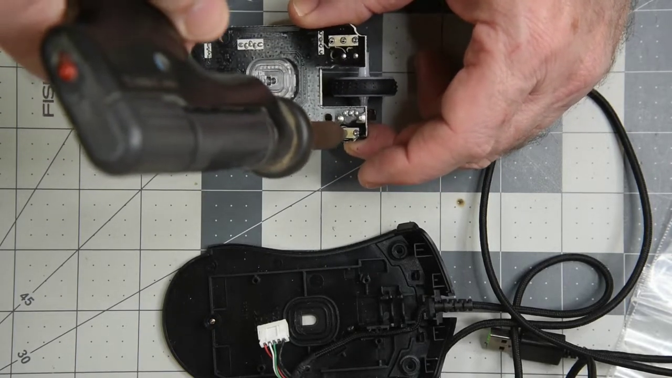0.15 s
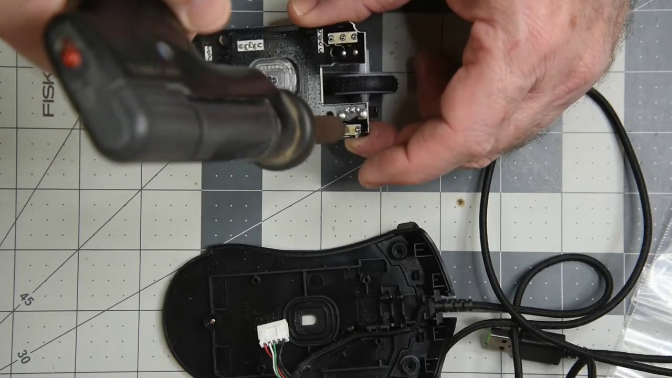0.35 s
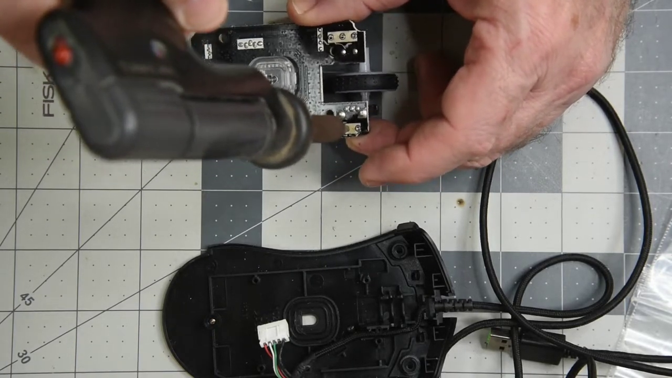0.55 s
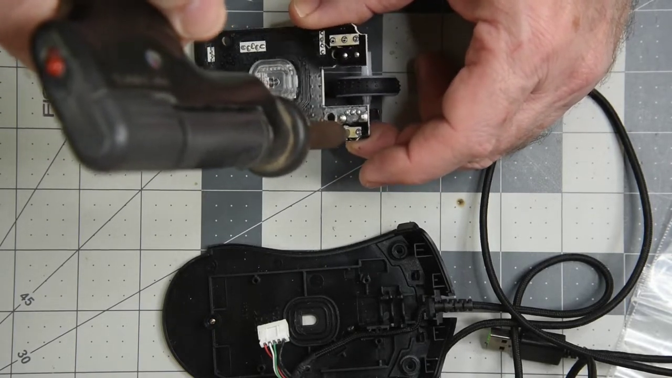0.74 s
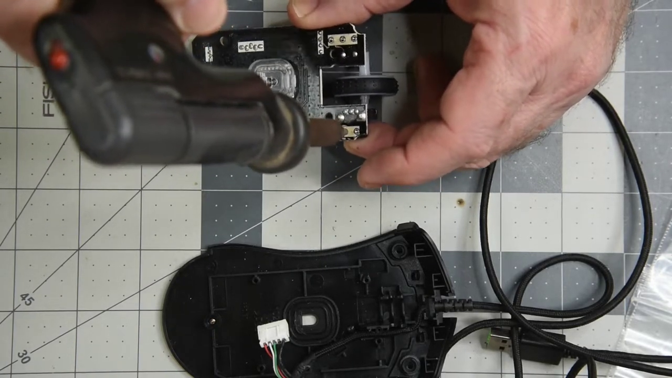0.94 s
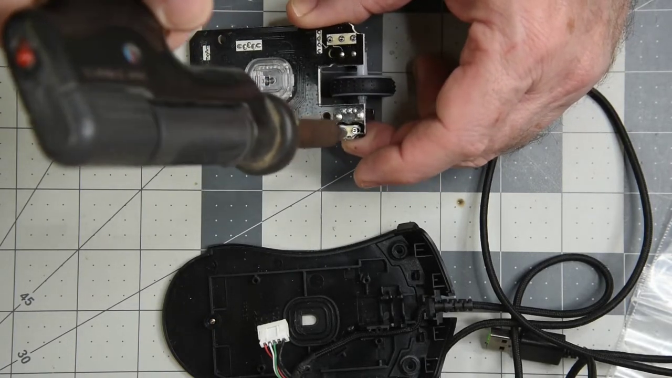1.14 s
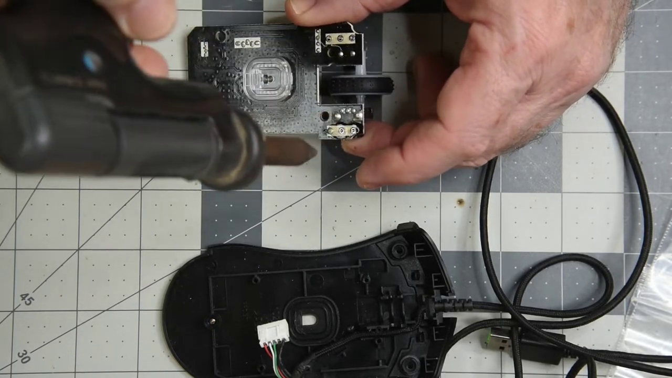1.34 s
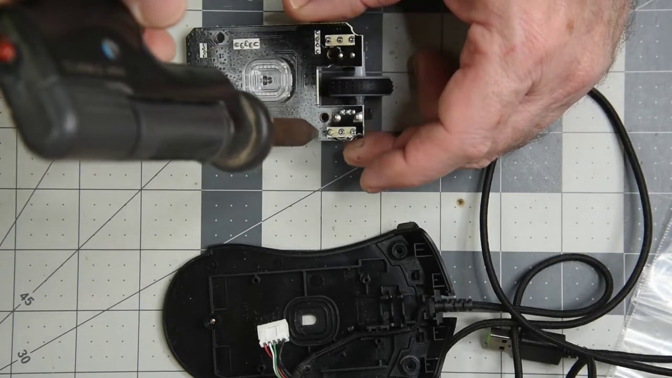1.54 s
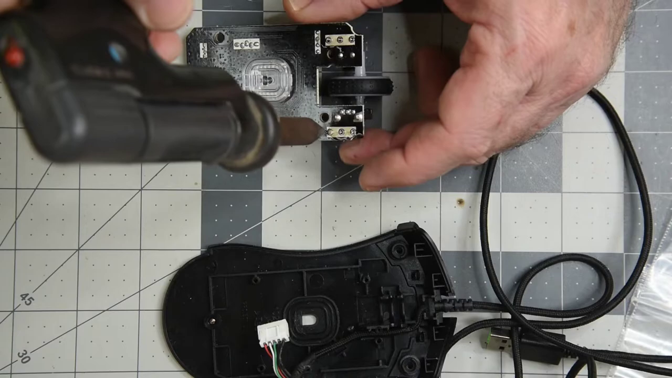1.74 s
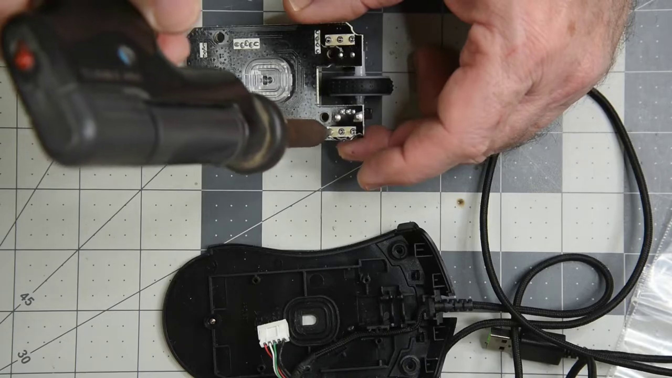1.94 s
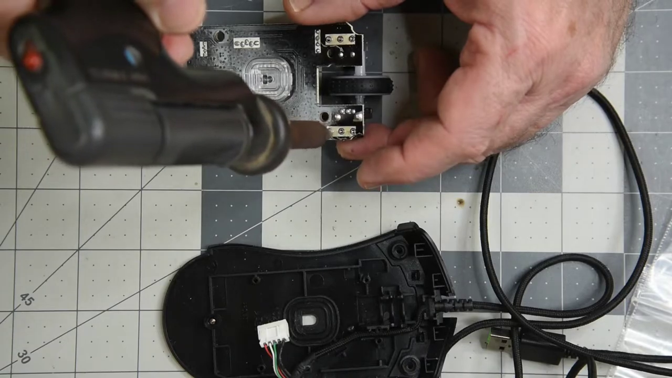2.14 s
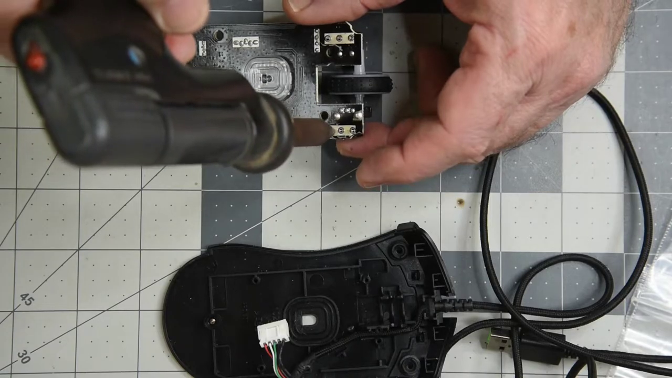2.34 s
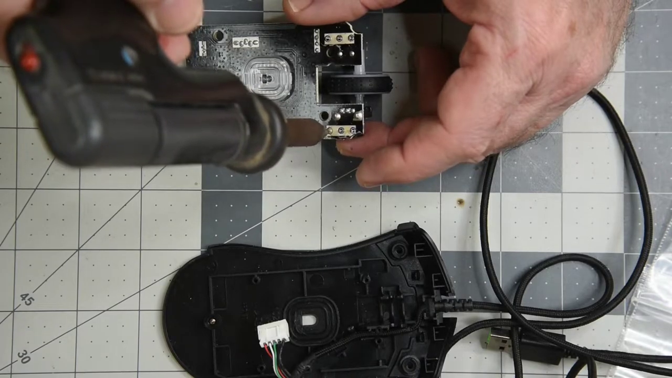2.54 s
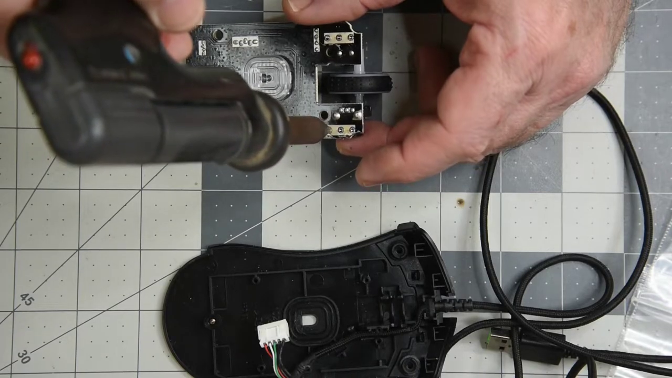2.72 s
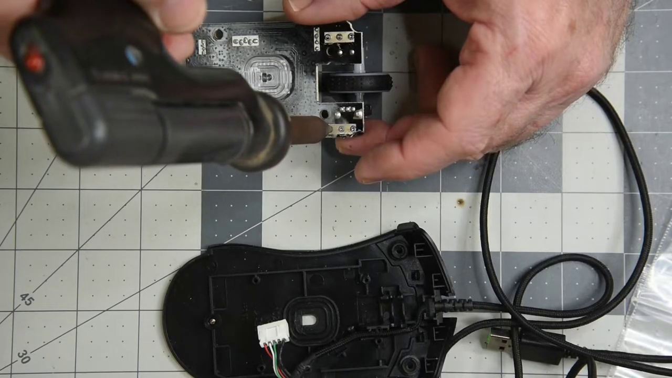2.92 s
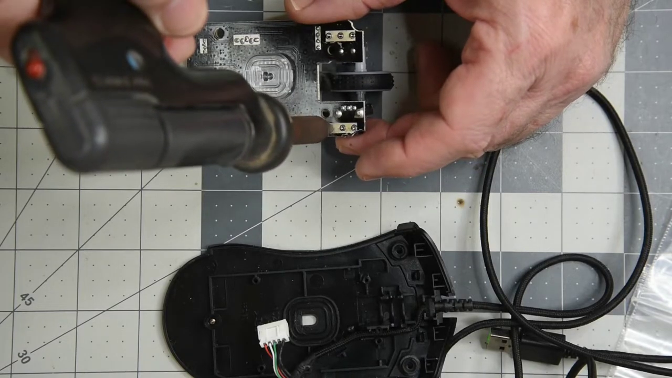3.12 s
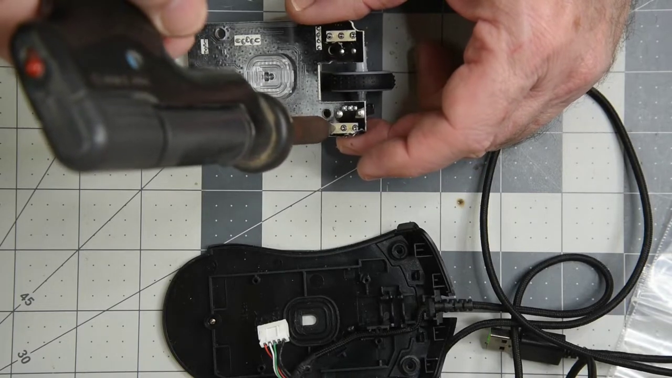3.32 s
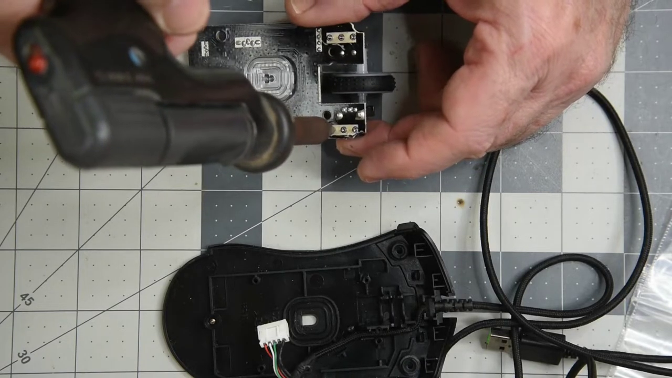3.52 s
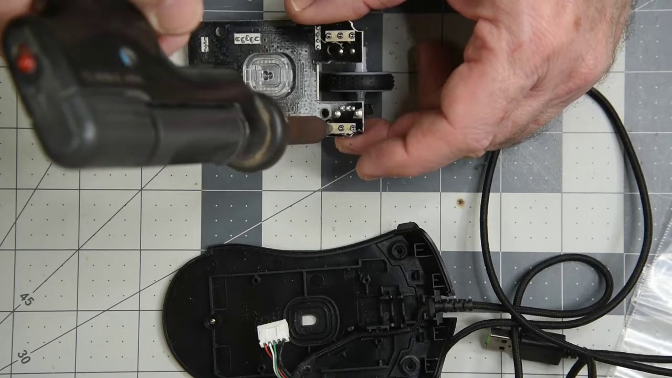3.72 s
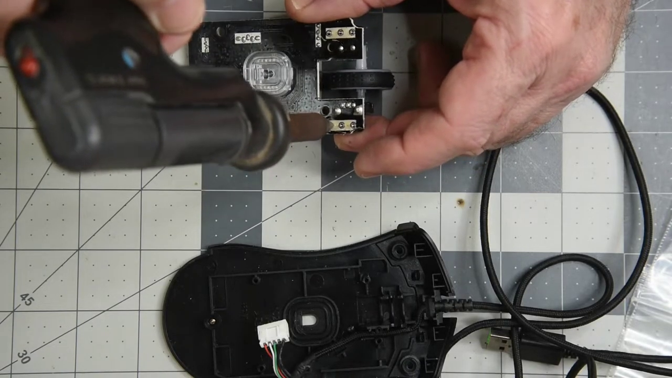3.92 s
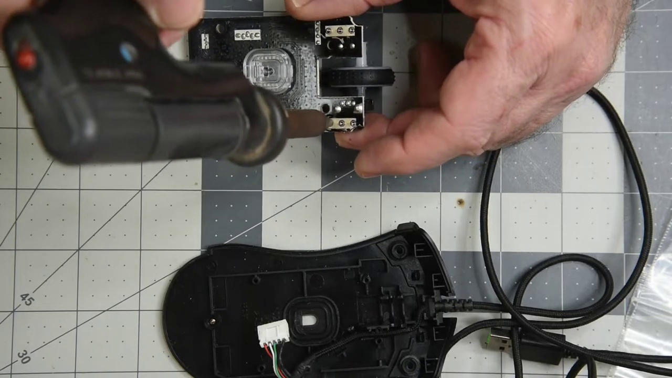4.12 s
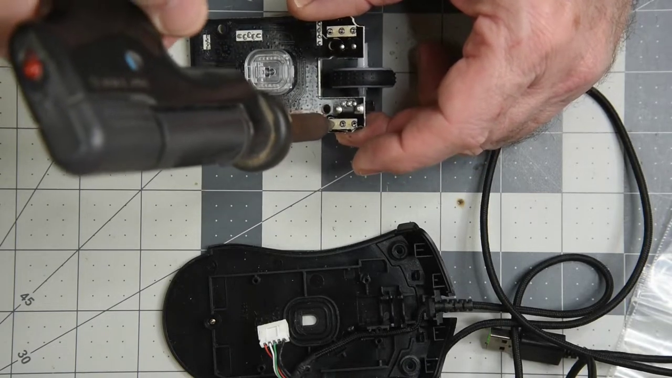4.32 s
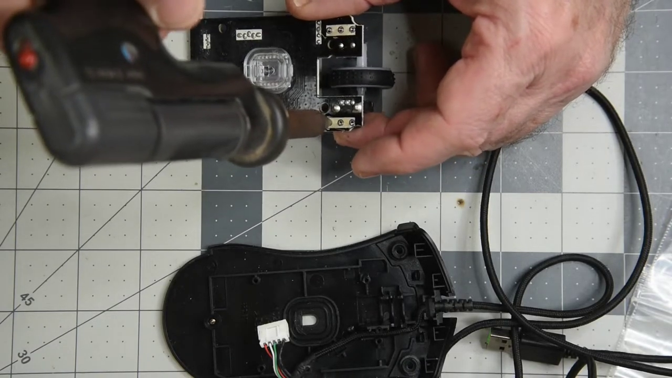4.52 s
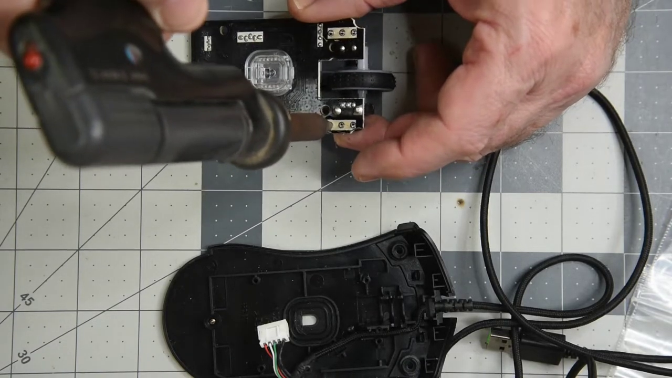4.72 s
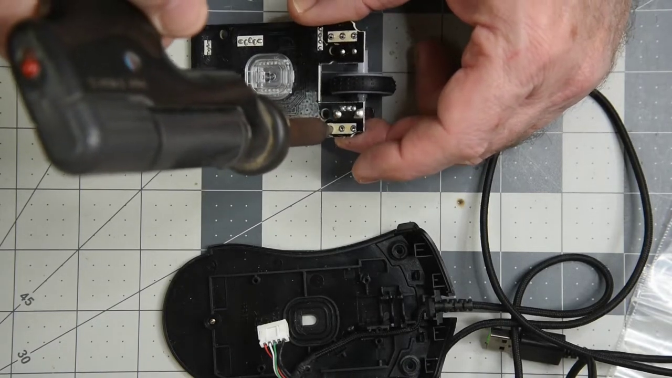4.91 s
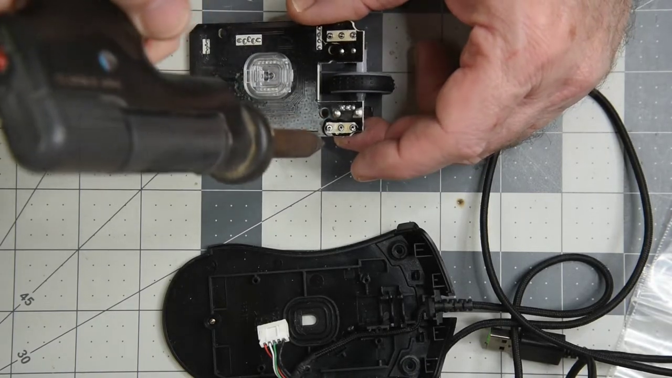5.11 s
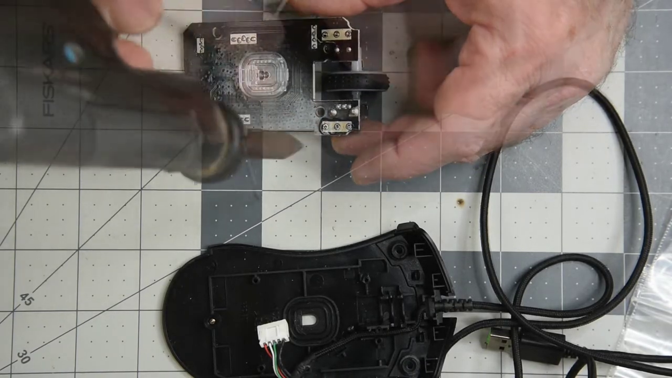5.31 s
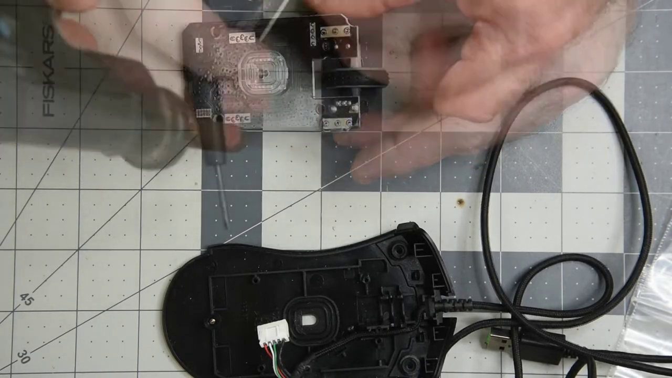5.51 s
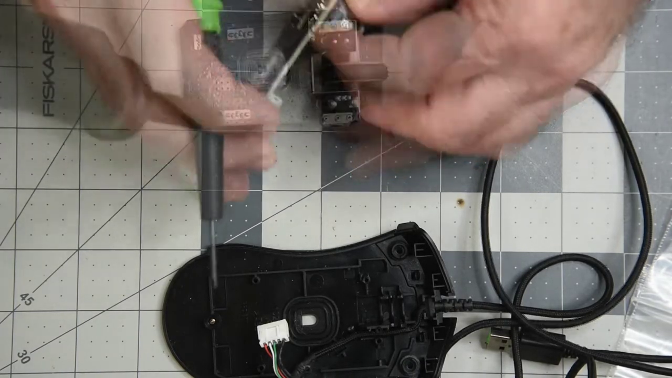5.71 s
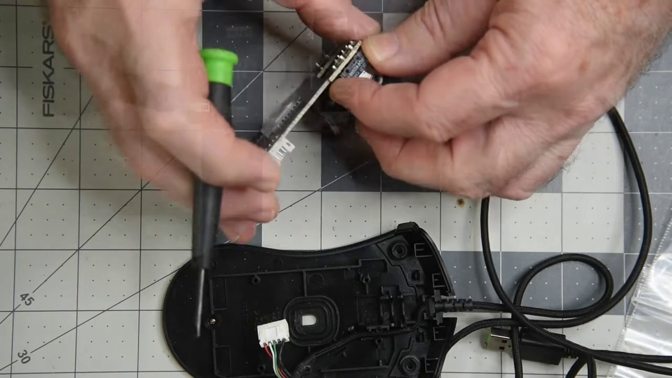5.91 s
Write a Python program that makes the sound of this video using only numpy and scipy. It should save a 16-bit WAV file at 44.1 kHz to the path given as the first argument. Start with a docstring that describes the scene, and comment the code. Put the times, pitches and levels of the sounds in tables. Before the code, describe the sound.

A trigger clicks, a small motor pump rattles with rushing suction air, then clunks off; after quiet ticking on a circuit board it runs once more.

```python
"""Two bursts of pump buzz and hissing air, each framed by a trigger click and a valve clunk, over a soft hum.
A vacuum desoldering gun clears two joints: a diaphragm pump speeds up to 28 strokes a second, a solenoid
valve opens, air rushes through the nozzle; on release the pump coasts down and the valve drops shut.
Place: a quiet workbench in stereo, the station left of centre, the gun central, the board slightly right.
Motors are summed harmonics and hits on a crank angle; air is coloured noise; knocks are dying noise bursts."""
import sys
import numpy as np
from scipy import signal
from scipy.fft import rfft, irfft, next_fast_len
from scipy.io import wavfile

SR = 44100
rng = np.random.default_rng(int(sys.argv[2]) if len(sys.argv) > 2 else 0)


def wrap_up_sound(samples):
    """Save the sound to the file named by the first command line argument, as 16-bit audio."""
    columns = np.atleast_2d(samples).T
    # keep every value between -1 and 1, then stretch to whole-number steps
    tamed = np.clip(columns, -1, 1)
    steps = np.round(tamed * 32767).astype(np.int16)
    wavfile.write(sys.argv[1], SR, steps)


N = 267157
T = np.arange(N) / SR   # time [s]

# All spectra hold relative levels; the sources set the loudness.
# Pulls of the trigger: (motor on [s], valve opens [s], motor off [s], a moment when the diaphragm
# bottoms out [s], full speed [strokes/s], level [dB])
PUMP_RUNS = [(.227, .2688, 1.154, .7606, 28.2, 0), (4.252, 4.4003, 5.0515, 4.7626, 27.97, .8)]
# Pump housing response: (multiple of the full stroke rate, level [dB])
HOUSING_ORDERS = [(1, -28), (2, -7), (3, -28), (4, -14), (5, -13), (6, -10), (7, -13), (8, -9), (9, -4),
                  (10, -4), (11, -13), (12, -4), (13, 0), (14, -9), (15, -2), (16, -12), (17, -19),
                  (18, -11), (19, -20), (20, -15), (21, -18), (22, -15), (23, -15), (24, -15), (25, -20),
                  (26, -14), (27, -15), (28, -14), (29, -22), (30, -31), (31, -21), (32, -16), (33, -22),
                  (34, -10), (35, -7), (36, -21), (37, -16), (38, -15), (39, -20), (40, -23)]
# Flap valves and linkage within one stroke: (share of the turn, level [dB])
CRANK_CONTACTS = [(0.094, 8), (0.173, -5.5), (0.385, -3), (0.493, 0.5), (0.584, -15), (0.723, -5),
                  (.975, 4)]
# Colour of those contacts: (frequency [Hz], level [dB])
RATTLE_COLOUR = [(850, -23.5), (1130, 5), (1400, 7), (1750, 0.5), (2150, 1), (2480, 11), (2800, 0.5),
                 (3250, -10), (3600, -10.5), (5000, -8.5), (8000, -53)]
# Air churning in the case: (frequency [Hz], level [dB])
CHURN_COLOUR = [(60, -36), (170, 2), (250, 12), (360, -4), (540, -26), (700, 15), (840, 3), (980, 15),
                (1200, -41), (2400, -17), (3300, -73)]
# Air in hose, nozzle and tip, one spectrum for each: (frequency [Hz], level [dB])
AIR_BANDS = [
    [(2700, 1), (3600, -5.5), (5200, -1), (5950, 6.5), (6900, 5), (7700, -20)],
    [(6300, -12), (7200, 5.5), (8300, 8.5), (9400, 8), (11200, 0.5), (12300, -19)],
    [(10400, -19.5), (11700, 2), (13300, -1.5), (14600, -5), (15600, -9), (16500, -30)],
]
# Tube resonances: (frequency [Hz], width [Hz], level [dB])
TUBE_PEAKS = [(5770, 110, 5), (7280, 90, 0.5), (8800, 96, 3.5), (9350, 160, 3), (10300, 270, 3.5),
              (13500, 280, 5.5)]
# Flow in hose, nozzle and tip: (steady suction [dB], gasp at motor start [dB],
# gush as the valve opens [dB], fall while coasting [dB/s])
AIR_FLOWS = [(-55.5, -48.5, -52, 109), (-51.5, -49.5, -47, 54), (-58, -71, -53.5, 2)]
# Air pulses on the stroke and on its return: (share of the turn, strength)
STROKE_PUFFS = [(.07, 0.64), (.58, 0.68)]
# Molten solder slurping through the tip: (time [s], length [s], level [dB])
SOLDER_SLURPS = [(0.556, 0.125, -49.5), (0.802, 0.12, -43)]
# Colour of the slurps: (frequency [Hz], level [dB])
SLURP_COLOUR = [(5000, -18), (8000, -2.5), (10000, -1), (12000, -5), (13800, 4), (15000, -3), (16000, -12)]
# Plunger hit and bounces as the valve opens: (time after the first hit [s], level [dB])
OPENING_BOUNCES = [(0, -28), (.0048, -34.5), (.015, -46), (.035, -43)]
# Plunger hit and bounces as the valve shuts: (time after the first hit [s], level [dB])
SHUTTING_BOUNCES = [(0, -38.5), (.007, -36), (0.034, -45.5)]
# Colour of the opening hits: (frequency [Hz], level [dB])
OPENING_COLOUR = [(90, -32), (180, -40), (280, 23), (440, 20), (620, 12.5), (1020, 18), (1250, 11.5),
                  (1500, 14.5), (2100, 18.5), (3300, 9), (4500, 7), (7000, -6), (9500, 1.5), (16000, -38)]
# Colour of the shutting hits: (frequency [Hz], level [dB])
SHUTTING_COLOUR = [(50, -42), (130, -24), (220, -5), (420, 0), (580, -5), (850, -3), (1400, -8), (2050, -6),
                   (2700, -20), (5500, -21), (10000, -26), (16000, -38)]
# Ringing of the station case: (frequency [Hz], level [dB], time to fall 60 dB [s])
STATION_CASE_MODES = [(246, -11, .1), (377, -6, .2), (456, -9, .08), (1018, -16, .07)]
# Trigger pressed: (time [s], level [dB])
TRIGGER_PRESSES = [(.063, -29.5), (4.1917, -30)]
# Trigger let go: (time [s], level [dB], ping of its spring [Hz])
TRIGGER_RELEASES = [(1.104, -30, 4516), (5.008, -30, 4950), (5.071, -41, 4390)]
# Colour of the press: (frequency [Hz], level [dB])
PRESS_COLOUR = [(590, -56), (1000, -18), (1200, -55), (1670, -10), (2470, -21.5), (2740, 2.5), (3340, -6.5),
                (4360, 1.5), (5630, 0.5), (6180, -4), (6550, 4.5), (7350, 1), (13800, -19), (15100, -16),
                (16000, -19)]
# Colour of the release: (frequency [Hz], level [dB])
RELEASE_COLOUR = [(2000, -21), (2800, 8), (3600, 6), (4150, 0), (4600, 12.5), (5150, 5), (7000, 10),
                  (8000, 1), (10500, 8), (13000, 0.5), (16000, -4)]
# Solder spitting up the nozzle: (time [s], level [dB])
SOLDER_SPITS = [(.2843, -31.5), (.296, -47), (.335, -33.5), (.4395, -37), (4.2908, -40.5), (4.42, -31.5),
                (4.4784, -39), (4.524, -35), (4.5702, -35), (4.7308, -33)]
# Colour of the spits: (frequency [Hz], level [dB])
SPIT_COLOUR = [(1200, -35), (2600, 3), (4500, -1.5), (7000, 7), (10000, 5), (14000, -3), (16000, -26)]
# Tip and fingers knocking the board: (time [s], level [dB])
BOARD_TAPS = [(2.549, -55.5), (2.669, -51), (2.775, -52.5), (2.789, -55), (3.568, -50.5), (3.971, -52),
              (5.331, -49.5), (5.461, -49)]
# Colour of the knocks, also of the sliding board: (frequency [Hz], level [dB])
BOARD_COLOUR = [(700, -6), (1600, -10), (2350, 1), (2750, -1), (3250, -3.5), (4300, -18), (7000, -18.5),
                (10000, -21), (16000, -57)]
# Tip catching on a pin: (time [s], level [dB])
PIN_TICKS = [(2.775, -60.5), (3.4045, -58), (3.632, -61), (3.6764, -59.5), (3.7447, -55.5), (3.779, -52.5),
             (4.077, -53), (4.1125, -48)]
# Colour of the pins: (frequency [Hz], level [dB])
PIN_COLOUR = [(1500, -13), (3000, -7), (5500, -2.5), (8400, 4), (10000, -1), (11100, 2.5), (12500, -7),
              (16000, -16)]
# Board slid and lifted: (time [s], length [s], level [dB])
BOARD_SLIDES = [(5.53, 0.18, -57), (5.844, 0.14, -60.5), (5.982, 0.074, -51.5)]
# Hum of the bench equipment: (frequency [Hz], level [dB])
HUM_TONES = [(120, -75), (240, -72.5), (360, -70), (480, -86), (720, -87), (1215, -83), (1323, -79.5),
             (1393, -81), (1449, -85)]
# Colour of the room noise: (frequency [Hz], level [dB])
ROOM_COLOUR = [(15, -35), (25, -10), (69, -9.5), (118, -11), (184, -14.5), (237, -9), (300, -11),
               (355, -10.5), (412, -13.5), (478, -12), (1100, -14.5), (1350, -14), (1610, -16.5),
               (2250, -12.5), (4000, -30.5), (5200, -64), (8800, -120)]
# Background hiss: (time [s], level [dB])
HISS_LEVEL = [(0, -73), (2.6, -75), (2.85, -72.5), (3.4, -75), (5.4, -70)]
# Colour of the hiss: (frequency [Hz], level [dB])
HISS_COLOUR = [(2060, -20), (3500, -0.5), (3730, -4.5), (4600, 4), (5090, -2.5), (6200, -3), (7850, -2),
               (9990, -1.5), (11000, -5), (12800, -3), (16000, -18)]
# Stereo spread of the room: (frequency [Hz], side level against mid [dB])
ROOM_SPREAD = [(60, -18), (110, -2), (200, -11), (380, -2), (700, -9), (1290, 1), (2380, 0.5), (4400, -0.5),
               (8120, -1), (15000, -20.5)]
# Stereo spread of the station: (frequency [Hz], side level against mid [dB])
STATION_SPREAD = [(100, -40), (400, -11), (900, -11), (2500, -4.5), (12000, 3)]
# Stereo spread of gun and board: (frequency [Hz], side level against mid [dB])
GUN_SPREAD = [(1000, -20), (3000, -3.5), (6000, -1.5), (10000, -13.5), (15000, -13)]

STATION_LEAD = 9   # samples by which the station reaches the left channel first
START_SPEED, SPIN_UP_S = 19, .06   # strokes/s at once, then the time constant towards full speed
COAST_S, COAST_LOSS = .156, 8   # from motor off until the valve shuts; strokes/s lost by then
ATTACK_S = 0.0059   # rise of the pump, of the valve's flow and of the surge
THUMP_DB, CHURN_DB = -45.5, -57   # before the pump's effort
EFFORT_DB_PER_SPEED = 0.05   # louder by this for each extra stroke/s
COAST_DB_PER_S = 116   # fade of the pump without power
SURGE_DB, SURGE_S = 4, 0.12   # extra labour as the valve opens; time constant
GASP_S, GUSH_S = 0.039, 0.12   # time constants of the air
LEAK_DB = -9.5   # air past the shut valve, relative to steady suction
SHUT_DB_PER_S = 270   # extra fall of the flow once the valve has shut
SLURP_EDGE_S, SLIDE_EDGE_S = .018, 0.073
BLEED_HZ, BLEED_SAG_HZ_PER_S, BLEED_DB = 13200, 27000, -54
BLEED_S, BLEED_EDGE_S = 0.212, 0.048
CASE_BUILD_S = 0.0058   # the case takes this long to start ringing
ROOM_DB = -67
CUTOFF_HZ = 15900


def pump(on_s, open_s, off_s, full_stroke_s, full_speed, run_db,
         body_db=0.27, linkage_db=-50.0, uneven_db=0.6, size=65536):
    """One run: the crank angle times the thump, the rattle and the puffs of air."""
    speed = motor_speed(on_s, off_s, full_speed)
    turns = np.cumsum(speed) / SR
    turns -= np.interp(full_stroke_s, T, turns)   # whole turns fall where the diaphragm bottoms out
    start = round(on_s * SR)
    on = slice(start, start + size)

    body = from_db(CHURN_DB) * noise(CHURN_COLOUR, STATION_SPREAD, lead=STATION_LEAD)
    body[:, on] += from_db(THUMP_DB) * thump(turns[on], speed[on])
    body[:, on] += from_db(linkage_db) * pan(rattle(turns[on]), left_db=2.5)

    surge_db = SURGE_DB * rise(open_s, ATTACK_S) * np.exp(-since(open_s) / SURGE_S)
    effort_db = body_db + surge_db + uneven_db * drift(25)
    effort_db = effort_db + EFFORT_DB_PER_SPEED * (speed - full_speed) - COAST_DB_PER_S * since(off_s)
    flow = air(on_s, open_s, off_s, turns)
    return from_db(run_db) * rise(on_s, ATTACK_S) * (from_db(effort_db) * body + flow)


def motor_speed(on_s, off_s, full_speed):
    """Strokes per second: the motor jumps to its start speed, creeps up to full speed and coasts down."""
    missing = (full_speed - START_SPEED) * np.exp(-since(on_s) / SPIN_UP_S)
    coasted = np.minimum(since(off_s) / COAST_S, 1) ** 1.6
    return full_speed - missing - COAST_LOSS * coasted


def thump(turns, speed, scatter=0.6, smear=0.11, slack=4.4):
    """The diaphragm shakes the housing once a turn; orders cross fixed resonances as the speed changes."""
    out = np.zeros((2, len(turns)))
    share = speed / speed.max()
    orders, housing_db = np.transpose(HOUSING_ORDERS)
    for order, chance in zip(np.round(orders), rng.standard_normal(len(orders))):
        # the pulse blurs in high orders and at low speed
        spread = scatter + smear * max(order - 15, 0) + slack * (1 - share)
        phase = 2 * np.pi * order * turns + chance * spread
        gain = from_db(np.interp(order * share, orders, housing_db))
        if order == 2:   # the rotor's unbalance grows with speed
            gain = gain * share ** 2
        lead = 2 * np.pi * order * speed * STATION_LEAD / SR
        out += gain * np.cos([phase + lead, phase])
    return out / np.sqrt(np.sum(from_db(housing_db) ** 2) / 2)


def rattle(turns, ring_t60=0.084, loose=0.31, size=4096):
    """Flaps and linkage hit at fixed crank angles, each with its own ring; loose parts add a rasp."""
    out, length, envelope = 0, len(turns), dying(ring_t60, size)
    for share, db in CRANK_CONTACTS:
        passed = np.floor(turns - share)
        hits = np.diff(passed, prepend=passed[0])   # one click per turn
        hits = hits * from_db(db + rng.uniform(-3, 3, length))
        contact_ring = noise(RATTLE_COLOUR, STATION_SPREAD, size, STATION_LEAD) * envelope
        rasp_envelope = signal.fftconvolve(hits, envelope)[:length]
        rasp = noise(RATTLE_COLOUR, STATION_SPREAD, length, STATION_LEAD) * rasp_envelope
        out = out + signal.fftconvolve(hits[None], contact_ring, axes=1)[:, :length] + loose * rasp
    return rms_one(out)


def air(on_s, open_s, off_s, turns, puff_db=2.0, sputter_db=2.5):
    """Air gasps at the start, gushes as the valve opens and settles; it puffs with the strokes and sputters."""
    puff = sum(strength * np.exp(5 * (np.cos(2 * np.pi * (turns - share)) - 1))
               for share, strength in STROKE_PUFFS)
    flutter = from_db(puff_db * (puff - puff.mean()) + sputter_db * drift(84))   # sputter on the solder
    out, opened = 0, rise(open_s, ATTACK_S)
    for colour, (steady_db, gasp_db, gush_db, fall_db_per_s) in zip(AIR_BANDS, AIR_FLOWS):
        gasp = from_db(gasp_db) * np.exp(-since(on_s) / GASP_S)
        gush = from_db(gush_db) * np.exp(-since(open_s) / GUSH_S)
        shut_flow = from_db(steady_db + LEAK_DB) + gasp
        open_flow = from_db(steady_db) + gush
        release = from_db(-fall_db_per_s * since(off_s) - SHUT_DB_PER_S * since(off_s + COAST_S))
        flow = ((1 - opened) * shut_flow + opened * open_flow) * release
        out = out + flow * noise(colour, GUN_SPREAD, peaks=TUBE_PEAKS)
    return flutter * out


def slurps(sputter_db=0.5):
    """Air tears through molten solder with a bright, sputtering sizzle."""
    flow = sum(from_db(db) * swell(s, length, SLURP_EDGE_S) for s, length, db in SOLDER_SLURPS)
    return flow * from_db(sputter_db * drift(100)) * noise(SLURP_COLOUR, GUN_SPREAD, peaks=TUBE_PEAKS)


def bleed(off_s):
    """The vacuum bleeds off: a band of turbulence slides down as the pressure evens out."""
    # (distance from the centre [Hz], level [dB])
    band = [(50, 0), (550, -1), (1100, -10), (2200, -30), (8000, -60)]
    centre_hz = BLEED_HZ - BLEED_SAG_HZ_PER_S * since(off_s)
    phase = 2 * np.pi * np.cumsum(centre_hz) / SR
    envelope = from_db(BLEED_DB) * swell(off_s, BLEED_S, BLEED_EDGE_S)
    return envelope * np.cos(phase) * noise(band, GUN_SPREAD)


def valve(opening_db=-2.0, shutting_db=4.0):
    """The solenoid plunger slams in and drops back, bouncing, and the station case rings with each hit."""
    openings = [(open_s + delay, db) for _, open_s, *_ in PUMP_RUNS for delay, db in OPENING_BOUNCES]
    shuttings = [(off_s + COAST_S + delay, db) for _, _, off_s, *_ in PUMP_RUNS
                 for delay, db in SHUTTING_BOUNCES]
    out = blows(openings, OPENING_COLOUR, STATION_SPREAD, t60=.11, tail_db=-13, tail_t60=.4,
                lead=STATION_LEAD)
    out += blows(shuttings, SHUTTING_COLOUR, STATION_SPREAD, t60=0.055, tail_db=-9.5, tail_t60=.26,
                 lead=STATION_LEAD)
    case = ring(STATION_CASE_MODES)
    case = case * rise(0, CASE_BUILD_S)[:len(case)]
    for events, ring_db in (openings, opening_db), (shuttings, shutting_db):
        for s, db in events:
            add(out, s, from_db(db + ring_db) * case)
    return pan(out, left_db=2.5)


def gun(spring_db=-3.0, spring_t60=0.046):
    """The trigger snaps in the plastic grip, its spring pings on release; solder drops spit up the nozzle."""
    out = blows(TRIGGER_PRESSES, PRESS_COLOUR, GUN_SPREAD, t60=0.027, tail_db=-14.0, tail_t60=0.21)
    out += blows(TRIGGER_RELEASES, RELEASE_COLOUR, GUN_SPREAD, t60=0.026, tail_db=-8, tail_t60=0.16)
    for s, db, hz in TRIGGER_RELEASES:
        add(out, s, from_db(db) * ring([(hz, spring_db, spring_t60)]))
    return out + blows(SOLDER_SPITS, SPIT_COLOUR, GUN_SPREAD, t60=0.031, tail_db=-24, tail_t60=0.064)


def board(grain_db=2.5):
    """Tip and fingers knock board and pins in short bursts; at the end the board slides as grainy noise."""
    taps = blows(BOARD_TAPS, BOARD_COLOUR, GUN_SPREAD, t60=0.03, tail_db=-14.5, tail_t60=0.31)
    ticks = blows(PIN_TICKS, PIN_COLOUR, GUN_SPREAD, t60=0.03, tail_db=-4.5, tail_t60=0.12)
    push = sum(from_db(db) * swell(s, length, SLIDE_EDGE_S) for s, length, db in BOARD_SLIDES)
    grain = rms_one(from_db(grain_db * drift(150)))
    slide = push * noise(BOARD_COLOUR, GUN_SPREAD) * grain
    return pan(taps + ticks + slide, left_db=-1.5)


def bench(waver_rad=0.36, flutter_db=1.74):
    """Equipment hums with slightly wavering tones over soft room noise and hiss."""
    hum = 0
    for hz, db in HUM_TONES:
        waver = waver_rad * hz / 360 * drift(1)   # phase wander, wider for higher tones
        hum = hum + from_db(db + flutter_db * drift(9.6)) * np.sin(2 * np.pi * hz * T + waver)
    room = from_db(ROOM_DB) * noise(ROOM_COLOUR, ROOM_SPREAD)
    hiss = level(HISS_LEVEL) * noise(HISS_COLOUR, ROOM_SPREAD)
    return np.sqrt(2) * hum + room + hiss   # sqrt(2) makes the tone levels rms


def blows(events, spectrum, width, t60, tail_db, tail_t60, lead=0, size=16384):
    """Each blow wakes a dense cluster of short modes; the room answers with a weak, longer tail."""
    out = np.zeros((2, N))
    for s, db, *_ in events:
        direct = noise(spectrum, width, size, lead) * dying(t60, size)
        tail = noise(spectrum, ROOM_SPREAD, size) * dying(tail_t60, size) * (1 - dying(t60, size))
        add(out, s, from_db(db) * (direct + from_db(tail_db) * tail))
    return out


def ring(modes, size=16384):
    """Struck modes, each dying at its own rate."""
    return sum(from_db(db) * np.sin(2 * np.pi * hz * T[:size]) * dying(t60, size) for hz, db, t60 in modes)


def noise(spectrum, width, size=N, lead=0, peaks=()):
    """Coloured stereo noise of rms 1, with resonances, a width and a lead on the left."""
    padded = next_fast_len(size)
    hz = np.arange(padded // 2 + 1) * SR / padded
    colour_db = at_hz(spectrum, hz) + sum(db / (1 + (2 * (hz - f) / w) ** 2) for f, w, db in peaks)
    mid, side = rfft(rng.standard_normal((2, padded))) * from_db(colour_db)
    side = side * from_db(at_hz(width, hz))
    left = (mid + side) * np.exp(2j * np.pi * hz * lead / SR)
    return rms_one(irfft(np.array([left, mid - side]), padded)[:, :size])


def drift(rate):
    """Smooth random wander of rms 1: noise through two equal poles at a rate in Hz."""
    r = np.exp(-80 * np.pi * rate / SR)   # drawn at every 40th sample
    slow = signal.lfilter([1], [1, -2 * r, r * r], rng.standard_normal(N // 40 + 2002))[2000:]
    return np.interp(np.arange(N) / 40, np.arange(len(slow)), rms_one(slow))


def from_db(db):
    """Amplitude factor for a level in dB."""
    return 10 ** (np.asarray(db) / 20)


def rms_one(x):
    """Scale to an rms of 1."""
    return x / np.sqrt(np.mean(x ** 2) + 1e-20)


def at_hz(points, hz):
    """Read a spectrum on a log-frequency axis."""
    points = np.array(points)
    return np.interp(np.log(np.maximum(hz, 1)), np.log(points[:, 0]), points[:, 1])


def level(rows):
    """Gain over time from rows of (time [s], level [dB])."""
    return from_db(np.interp(T, *np.transpose(rows)))


def pan(x, left_db):
    """Make the left channel louder than the right by left_db."""
    return x * from_db([[left_db / 2], [-left_db / 2]])


def dying(t60, size):
    """Exponential decay that falls 60 dB in t60 seconds."""
    return np.exp(-np.log(1000) * T[:size] / t60)


def since(s):
    """Seconds gone by since a moment, zero before it."""
    return np.maximum(T - s, 0)


def rise(s, attack_s):
    """A ramp from 0 to 1 that starts at a moment."""
    return np.minimum(since(s) / attack_s, 1)


def swell(s, length, edge_s):
    """Attack, hold and release."""
    return rise(s, edge_s) * (1 - rise(s + length - edge_s, edge_s))


def add(out, s, sound):
    """Mix a sound in at a time in seconds."""
    start = round(s * SR)
    out[:, start:start + sound.shape[-1]] += sound[..., :N - start]


def scene():
    """Two runs of the pump, with valve, trigger and board, over the hum of the bench."""
    runs = sum(pump(*run) for run in PUMP_RUNS)
    bleeds = sum(bleed(off_s) for _, _, off_s, *_ in PUMP_RUNS)
    return runs + bleeds + slurps() + valve() + gun() + board() + bench()


def record(dry):
    """A steep elliptic low-pass cuts the top."""
    lowpass = signal.ellip(10, .2, 80, CUTOFF_HZ, fs=SR, output="sos")   # 0.2 dB ripple, 80 dB stopband
    return signal.sosfilt(lowpass, dry)


dry = scene()
out = record(dry)
wrap_up_sound(out)
```